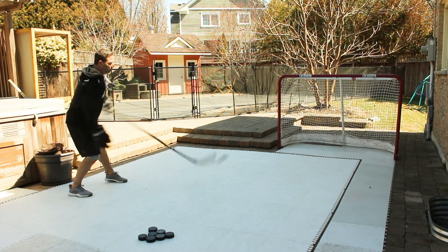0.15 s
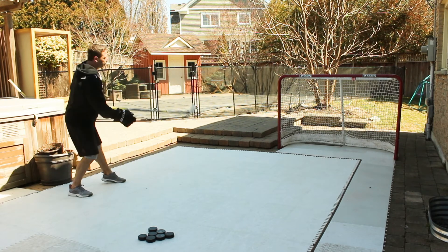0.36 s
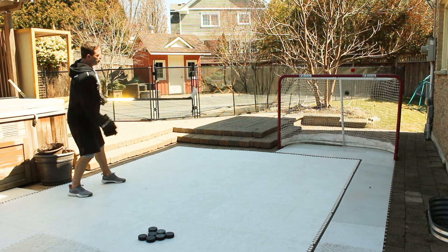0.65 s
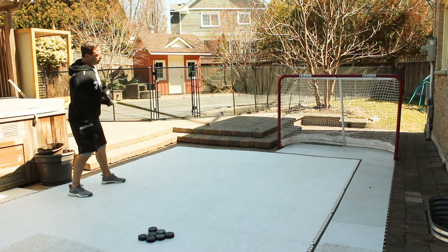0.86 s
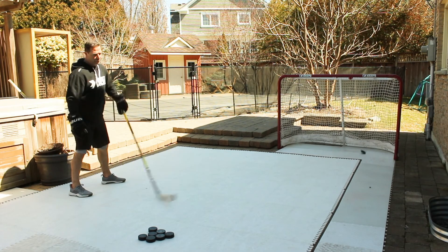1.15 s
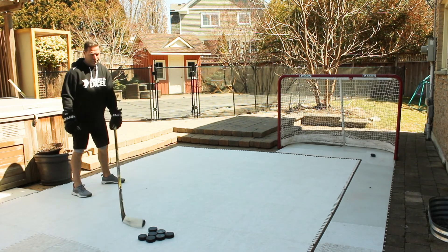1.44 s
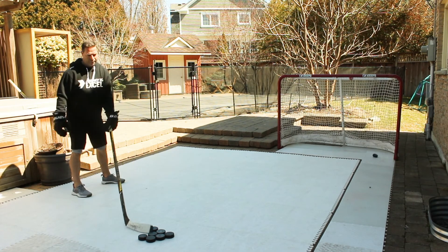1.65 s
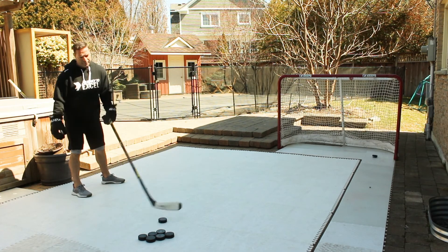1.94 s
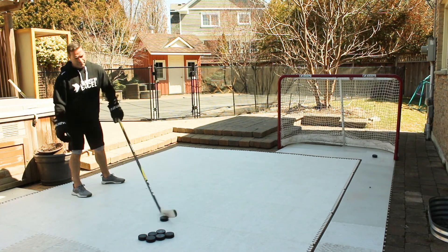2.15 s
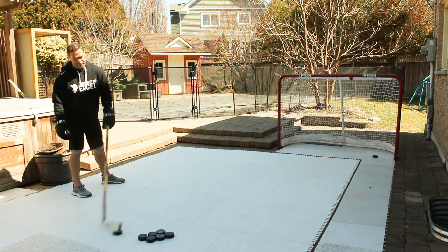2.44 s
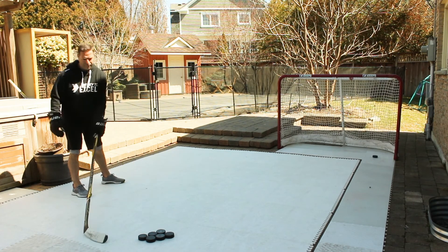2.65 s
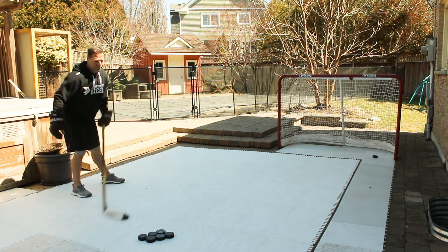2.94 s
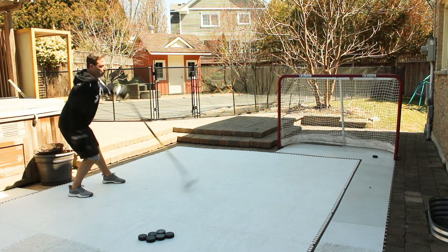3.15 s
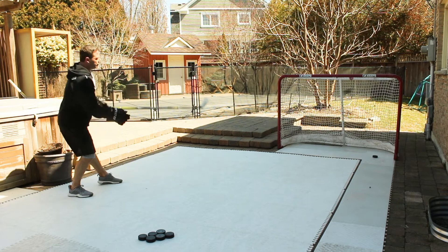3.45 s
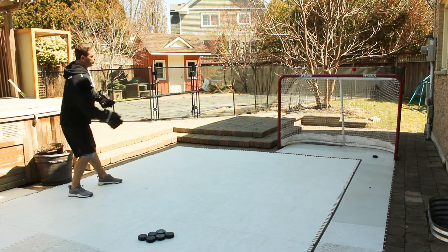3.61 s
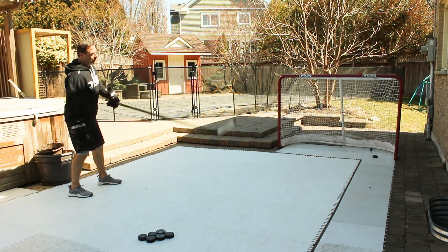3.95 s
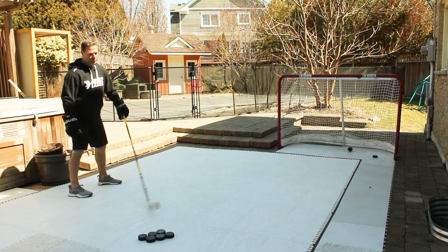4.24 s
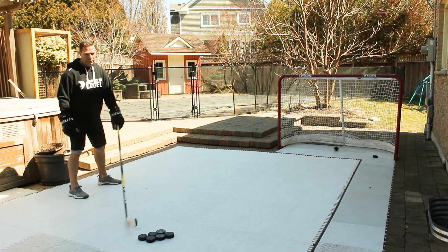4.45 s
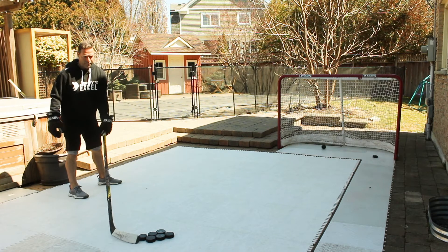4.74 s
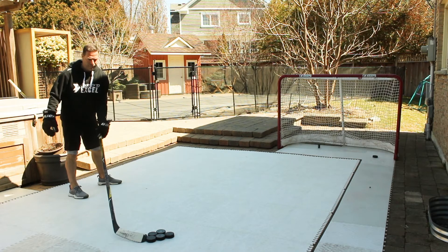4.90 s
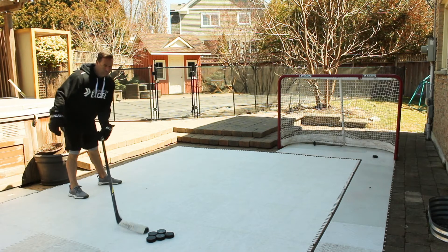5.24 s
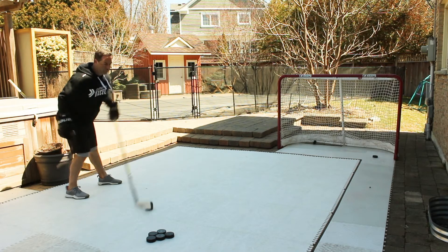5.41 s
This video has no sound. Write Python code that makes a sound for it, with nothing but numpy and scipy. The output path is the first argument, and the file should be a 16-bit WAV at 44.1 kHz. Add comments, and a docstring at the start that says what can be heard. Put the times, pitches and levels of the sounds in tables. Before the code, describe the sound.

A hockey stick scrapes a puck over plastic tiles right at the start, close by. From about 0.6 seconds the puck rustles into a net farther away, and the steel goal pings at 0.8. Sharp, hollow stick clacks come at 1.1 and 1.2 seconds, followed by a softly rumbling puck glide, light taps and further clacks near 2.1 and 2.6. A second shot swells into a drumming scrape from 3.0 to 3.2 seconds, landing with a quieter rustle and faint ring around 3.6. The stick clacks at 4.0 and harder at 4.25, then a puck slides with small knocks until about 5.0. A third scraping sweep builds from 5.2 seconds to the end. Each sound has a light, dull echo from the yard's fence and walls. A soft rush of outdoor air continues throughout, and a very faint, distant motor whine rises in pitch during the first three seconds.

```python
"""Sharp, hollow clacks and scrapes: someone practises hockey on plastic ice tiles in a fenced back yard.
The stick slaps the tiles, knocks a puck off the pile, taps it into place and sweeps it away.
The puck rustles into the net and rings the steel goal. Fence and house walls answer each sound,
and a motor whines far off in the soft rush of outdoor air."""
import sys
import numpy as np
from scipy import signal
from scipy.fft import rfft, irfft, next_fast_len
from scipy.io import wavfile
from scipy.ndimage import map_coordinates

SR = 44100
rng = np.random.default_rng(int(sys.argv[2]) if len(sys.argv) > 2 else 0)


def unload_audio(sound):
    """Save the sound as a 16-bit wav file, at the path given as the first command line argument."""
    columns = np.transpose(np.atleast_2d(sound))
    # keep every value between -1 and 1, then stretch to whole-number steps
    steps = np.round(np.clip(columns, -1, 1) * 32767)
    wavfile.write(sys.argv[1], SR, steps.astype(np.int16))


N = 245618
NOW = np.arange(N) / SR  # seconds into the scene
T = np.arange(SR // 6) / SR  # seconds since a hit
REBOUND_S = 0.012  # wait before the blade's second touch


def blows():
    """Hard hits of stick and puck; the springy blade touches again just after the first time."""
    # Each row: start in seconds; tile, thud, blade and crack in dB; clack in Hz; second touch in dB.
    hits = [(1.059, -15, -24, -14.5, -29, 1725, -2.5), (1.234, -13, -28.5, -20, -26.5, 2175, -13),
            (1.539, -25.5, -46, -28.5, -49.5, 2746, -6), (2.129, -21, -27.5, -24, -26.5, 1765, -8.5),
            (2.242, -29, -41, -28, -62, 1840, -7), (2.563, -15.5, -32.5, -25.5, -31, 2215, -5.5),
            (2.659, -28, -36.5, -32, -62, 1943, -5.5), (4.017, -21.5, -60, -14.5, -31.5, 2884, -5.5),
            (4.208, -24.5, -34, -25.5, -45, 1775, -3.5), (4.252, -12.5, -26.5, -17.5, -24, 1476, -9.5)]
    out = np.zeros((2, N))
    for start, tile_db, thud_db, blade_db, crack_db, clack_hz, rebound_db in hits:
        for delay, db in (0, 0), (REBOUND_S, rebound_db):
            hit = contact(thud_db, tile_db, blade_db, crack_db, clack_hz, ring_scale=0.88, top_hz=5700)
            add(out, start + delay, amp(db) * hit)
    return out


def contact(thud_db, tile_db, blade_db, crack_db, clack_hz, ring_scale, top_hz):
    """One touch: the tile bends and knocks hollowly, the blade clacks, the hard faces crack."""
    # Ringing tones. Each row: pitch in Hz, level in dB, fade time in seconds before ring_scale.
    thud_tones = [(304.3, -8, 0.06), (363, 2, 0.31), (438, -6.5, 0.14)]
    tile_tones = [(437, -10, 0.24), (542.4, -4.5, 0.19), (617.4, -0.5, 0.071), (745, 1, 0.082),
                  (931, -7.5, 0.17)]
    blade_tones = [(1150, 1, 0.054), (1508, 0, 0.05), (1716, -2, 0.17), (1910, 1, 0.079),
                   (2040, -11, 0.043), (2137, 0.5, 0.056), (2420, -3.5, .09), (2880, -3, 0.029),
                   (3055, -8, 0.11), (3250, -7, 0.064), (3474, -2.5, .1), (3820, -9.5, 0.16),
                   (4530, -3, 0.086)]
    # Noise colours. Each row: frequency in Hz, level in dB.
    thud_colour = [(25, -30), (70, -50.5), (110, -34), (160, -12.5), (240, -6), (330, 0), (430, -1.5),
                   (600, -17), (1200, -52)]
    tile_colour = [(30, -35), (120, -29), (250, -9.5), (400, 0), (600, 2.5), (800, -5), (1100, -8.5),
                   (1700, -23.5), (4000, -61)]
    blade_colour = [(300, -55), (800, -1), (1200, 2.5), (2000, 0), (2900, -1), (4200, -9.5), (5600, -14),
                    (8000, -16), (15000, -61)]
    crack_colour = [(1500, -35), (4000, -5), (6000, -6), (8000, 1), (10000, -6.5), (12500, -20),
                    (16000, -44)]
    thud = body(thud_tones, thud_colour, ring_scale, fade_s=0.24, tones_db=-1.5, snap=0.2)
    thud = blow_unit(thud * swell(0.0046))
    tile = body(tile_tones, tile_colour, ring_scale, fade_s=0.19, tones_db=-5.5, snap=0.81)
    tile = band(tile * swell(0.00077), low_hz=392, top_hz=3040)
    blade = body(blade_tones, blade_colour, ring_scale, fade_s=0.16, tones_db=-8.5, snap=0.36)
    blade = band(blade, low_hz=553, top_hz=top_hz)
    # The spot that is struck brings out one tone of the blade.
    clack = blow_unit(np.tile(np.sin(2 * np.pi * clack_hz * T) * fade(0.04), (2, 1)))
    blade = blow_unit(blade + amp(-8) * clack)
    crack = blow_unit(noise(crack_colour, len(T)) * (fade(0.11 * ring_scale) + 0.89 * fade(0.0084)))
    return amp(thud_db) * thud + amp(tile_db) * tile + amp(blade_db) * blade + amp(crack_db) * crack


def body(tones, colour, ring_scale, fade_s, tones_db, snap):
    """A struck object: clear tones over a noisy crowd of short ones, strongest at the very start."""
    crowd = blow_unit(noise(colour, len(T)) * (fade(fade_s * ring_scale) + snap * fade(0.017)))
    clear = ring(tones, ring_scale, scatter_db=3.5, detune=0.0075)
    return crowd + amp(tones_db) * blow_unit(np.tile(clear, (2, 1)))


def ring(tones, ring_scale, scatter_db, detune, t=T):
    """Fading tones; their strength and pitch shift with the place and grip of each hit."""
    out = np.zeros(len(t))
    for hz, db, fade_s in tones:
        louder, flip, higher = rng.standard_normal(3)
        wave = np.sign(flip) * np.sin(2 * np.pi * hz * (1 + detune * higher) * t)
        out += amp(db + scatter_db * louder) * wave * fade(fade_s * ring_scale, t)
    return out


def band(x, low_hz, top_hz):
    """Small objects give off little bass, and soft touches little treble."""
    return blow_unit(signal.sosfilt(signal.butter(2, [low_hz, top_hz], "band", fs=SR, output="sos"), x))


def taps():
    """The puck rocks softly against the blade and the tiles."""
    # Each row: start in seconds, then the tile, blade and crack levels in dB.
    touches = [(0.228, -56, -40.5, -75), (1.624, -40, -54, -79), (1.853, -42, -49.5, -71),
               (1.968, -46.5, -48.5, -75), (2.2, -31.5, -55, -54), (2.433, -30, -38.5, -53),
               (2.483, -32.5, -42, -49.5), (2.999, -30.5, -47, -57), (4.424, -36.5, -39, -53),
               (4.588, -38.5, -44.5, -79), (4.654, -35, -39.5, -62), (4.724, -40, -62, -73),
               (4.957, -46.5, -61, -77.5), (4.972, -44, -61, -82)]
    out = np.zeros((2, N))
    for start, tile_db, blade_db, crack_db in touches:
        add(out, start, tap(tile_db, blade_db, crack_db))
    return out


def tap(tile_db, blade_db, crack_db):
    """A soft double touch somewhere along the blade."""
    out = np.zeros((2, SR // 5))
    clack_hz = rng.uniform(1700, 2900)
    for delay, db in (0, 0), (REBOUND_S, -5):
        touch = contact(tile_db - 12, tile_db, blade_db, crack_db, clack_hz, ring_scale=0.96, top_hz=3120)
        add(out, delay, amp(db) * touch)
    return out


def sliding():
    """Shots and glides rub the same tiles, with a rough scrape and a fine hiss."""
    # Rubbing colours. Each row: frequency in Hz, level in dB.
    scrape_colour = [(400, -37), (1000, 3), (1600, -1.5), (2600, -2), (3800, -6.5), (5500, -15),
                     (9000, -26), (15000, -47)]
    hiss_colour = [(2000, -24.5), (4000, -3), (6000, -2.5), (8200, 5.5), (9700, 1.5), (11500, -12),
                   (16000, -24)]
    scrape = friction(scrape_colour, grain_db=2, grains_per_s=520)
    hiss = friction(hiss_colour, grain_db=2, grains_per_s=700)
    return shots(scrape, hiss) + glides(scrape, hiss)


def friction(colour, grain_db, grains_per_s):
    """Rubbing is countless tiny slips of uneven size that come in clumps."""
    return noise(colour, N, roughness=amp(grain_db * wobble(grains_per_s) + 0.93 * wobble(70)))


def shots(scrape, hiss):
    """The blade presses and eases off: tiles drum, it bites and scrapes, the puck flicks off its tip."""
    # Each row: start, bite, hardest press, flick and flick length in seconds, then level in dB.
    strokes = [(-0.2, -0.1, -0.02, 0.11, .048, -.5), (2.96, 3.015, 3.048, 3.2, .02, .5),
               (5.24, 5.295, 5.438, 5.64, .02, -1.5)]
    # The tiles drumming under the blade. Each row: frequency in Hz, level in dB.
    drum_colour = [(80, -52), (200, -24.5), (320, -7), (480, -1), (640, 1), (820, -1.5), (1100, -7.5),
                   (2000, -15.5), (5000, -45), (10000, -68)]
    out = np.zeros((2, N))
    drumming = friction(drum_colour, grain_db=0, grains_per_s=220)
    uneven_pressure = amp(1.2 * wobble(40))
    jump_s, jump_db = 0.018, 4.5  # the last of the pressure comes suddenly
    roll_s = 0.057  # the scrape lets up while the puck rolls out to the tip
    for start, bite, peak, flick, length, db in strokes:
        def press(on, off, build_db, ease_db):
            """Loudness builds up to the hardest press, then falls."""
            shape_db = np.interp(NOW, [on, peak - jump_s, peak, off], [-build_db, -jump_db, 0, -ease_db])
            return amp(db + shape_db) * gate(on, off, rise_s=0.26, fall_s=0.15) * uneven_pressure

        out += press(start, flick + length, build_db=12.5, ease_db=6.5) * amp(-30) * drumming
        out += press(bite, flick - roll_s, build_db=9, ease_db=4) * (amp(-33.5) * scrape + amp(-43) * hiss)
        spin = amp(db) * gate(flick, flick + length, rise_s=0.095, fall_s=0.11)
        out += spin * (amp(-31.5) * scrape + amp(-42.5) * hiss)
        if peak > 0:  # the bent blade slaps down
            add(out, peak, amp(db) * tap(tile_db=-25.5, blade_db=-33.5, crack_db=-48))
    return out


def glides(scrape, hiss):
    """A free puck rumbles and hisses ever more softly as it slows, bumping over tile seams."""
    # Each row: start and length in seconds, rumble in dB, its drop in dB per second, hiss in dB.
    slides = [(1.291, 0.96, -36.5, 23.5, -49.5), (2.158, 0.37, -39, 14, -57.5), (4.299, 0.63, -33, 37, -48)]
    # The puck's rumble. Each row: frequency in Hz, level in dB.
    rumble_colour = [(80, -46.5), (180, -22.5), (300, -5), (450, -2), (600, 1), (850, -4), (1300, -13.5),
                     (2500, -28), (5000, -43), (10000, -61)]
    seams_per_s, hiss_drop_db_per_s = 5, 61  # the hiss dies first
    out = np.zeros((2, N))
    rumble = friction(rumble_colour, grain_db=-2, grains_per_s=140) + amp(-15) * scrape
    for start, length, db, drop, hiss_db in slides:
        age = np.maximum(NOW - start, 0)
        moving = gate(start, start + length, rise_s=0.24, fall_s=0.39)
        out += moving * (amp(db - drop * age) * rumble + amp(hiss_db - hiss_drop_db_per_s * age) * hiss)
        for seam in np.arange(0.5, length * seams_per_s):
            after = (seam + rng.uniform(-0.5, 0.5)) / seams_per_s
            knock_db = db - drop * after - 2.5
            add(out, start + after, tap(knock_db, blade_db=knock_db - 11, crack_db=knock_db - 30))
    return out


def goal():
    """The net swallows the puck with a rustle and a thump; the steel pipe rings on."""
    # Each row: start in seconds, rustle in dB, rise in seconds, thump in dB, steel ring in dB.
    landings = [(0.56, -39, 0.021, -50, -63), (0.588, -37.5, 0.017, -54, -65.5),
                (0.798, -33, 0.0075, -71, -67), (0.814, -28.5, 0.0078, -64, -34.5),
                (3.604, -47, 0.013, -59, -80), (3.623, -48.5, 0.016, -64, -76),
                (3.672, -43.5, 0.0021, -61, -57.5)]
    # The pipe's tones. Each row: pitch in Hz, level in dB, fade time in seconds.
    steel_tones = [(2380, -2.5, 1), (2400, -5, 0.62), (2470, -14, 0.69), (2960, -4, 0.23),
                   (4170, -0.5, 0.15), (5712, -21, .5), (6500, -15, .4), (6700, -18, 0.43),
                   (6680, -9, 0.42)]
    # The net's noise colours. Each row: frequency in Hz, level in dB.
    rustle_colour = [(120, -50.5), (200, -20), (1090, -3), (2020, -5.5), (2380, -2), (2600, -7), (2950, -5),
                     (5170, -14), (7020, -17), (15000, -38.5)]
    thump_colour = [(60, -28), (110, -10), (155, 8), (230, -11), (600, -46)]
    out = np.zeros((2, N))
    for start, rustle_db, rise_s, thump_db, steel_db in landings:
        rustle = blow_unit(noise(rustle_colour, len(T)) * swell(rise_s) * fade(0.15))
        thump = blow_unit(noise(thump_colour, len(T)) * swell(rise_s) * fade(0.097))
        add(out, start, amp(rustle_db) * rustle + amp(thump_db) * thump)
        pipe = ring(steel_tones, ring_scale=1, scatter_db=1, detune=0, t=np.arange(SR) / SR)
        add(out, start, amp(steel_db) * pipe)
    return out


def yard(x):
    """Fence and house walls return a dull, scattered echo."""
    # How long the echo lasts. Each row: frequency in Hz, fade time in seconds.
    fade_times = [(100, 0.99), (500, 0.46), (2500, 1), (5000, 0.65), (9000, 0.27), (15000, 0.16)]
    # The echo's colour. Each row: frequency in Hz, level in dB.
    echo_colour = [(100, -0.5), (500, -3.5), (1200, -4.5), (3200, -7.5), (4300, -4.5), (6000, -3.5),
                   (12000, -1.5)]
    hz, t, bands = signal.stft(rng.standard_normal((4, 2, SR)), SR, nperseg=256)
    decay = fade(along(fade_times, hz)[:, None], t)
    bands = bands * decay * amp(along(echo_colour, hz))[:, None] * swell(0.013, t)
    tails = signal.istft(bands, SR, nperseg=256)[1]
    tails = tails + 0.64 * tails[:, ::-1]  # left and right hear much the same
    turn = np.arange(N) // (SR // 5) % len(tails)  # four random echoes take turns, so no tone sticks out
    return sum(signal.fftconvolve(x * (turn == k), tail / np.linalg.norm(tail[0]), axes=1)[:, :N]
               for k, tail in enumerate(tails))


def motor():
    """A far motor whines, louder as it speeds up; the long way through the air blurs its tones."""
    # Each row: time in seconds, pitch in Hz.
    pitch_path = [(.1, 1720), (.4, 2140), (.7, 2360), (1.0, 2443), (1.65, 2410), (2.08, 2616), (2.4, 2560),
                  (2.74, 2637), (2.9, 2420)]
    # The whine's tones as multiples of that pitch, and the level of each in dB.
    multiples = [1, 4 / 3, 2, 3, 4]
    levels_db = [2.5, 0, -2.5, -11, -18]
    pitch = np.interp(NOW, *np.transpose(pitch_path))
    flutter = 1 + 0.009 * wobble(220)
    phase = 2 * np.pi * np.cumsum(pitch * flutter) / SR
    whine = np.zeros((2, N))
    for channel in whine:
        for k, db in zip(multiples, levels_db):
            channel += amp(db) * (wobble(210) * np.sin(k * phase) + wobble(210) * np.cos(k * phase))
    level = amp(-59.5 + 6.5 * np.log2(pitch / pitch.max()))  # 6.5 dB louder per doubling of speed
    return level * gate(on=0.27, off=2.81, rise_s=0.56, fall_s=1) * whine


def air():
    """Outdoor air: a soft, low rush that barely wavers."""
    # Each row: frequency in Hz, level in dB.
    air_colour = [(15, -63), (25, -45), (92, -24.5), (117, -1), (166, -16), (206, -5.5), (263, -4.5),
                  (818, -13.5), (2160, -18), (2350, -17.5), (3430, -18.5), (3720, -17.5), (4140, -21.5),
                  (5730, -23), (16000, -35)]
    # Each row: frequency in Hz, how alike left and right are (1 is the same).
    air_likeness = [(60, 0.7), (240, 0.98), (950, 0.59), (3770, 0.07), (15000, -0.4)]
    return amp(-56.5 + 0.23 * wobble(7.8)) * noise(air_colour, N, air_likeness)


def noise(colour, size, likeness=None, roughness=1):
    """Stereo noise of average power 1, roughened first and then coloured."""
    # Each row: frequency in Hz, how alike left and right are (1 is the same).
    usual_likeness = [(100, 1), (500, 0.96), (2000, 0.66), (4000, 0.54), (12000, 0.27)]

    def response(hz):
        """Split each frequency into what both sides share and what sets them apart."""
        alike = along(usual_likeness if likeness is None else likeness, hz)
        angle = np.arccos(np.clip(alike, -1, 1)) / 2
        return amp(along(colour, hz)) * [np.cos(angle), np.sin(angle)]

    mid, side = filtered(roughness * rng.standard_normal((2, size)), response)
    stereo = np.array([mid + side, mid - side])
    return stereo / np.sqrt(np.mean(stereo ** 2) + 1e-20)


def amp(db):
    """Turn decibels into a gain."""
    return 10 ** (np.asarray(db) / 20)


def blow_unit(x):
    """Give a stereo burst the energy of 20 ms of sound at power 1."""
    return x / np.sqrt(np.sum(x ** 2) / (2 * SR * 0.02) + 1e-20)


def along(points, hz):
    """Read between rows of frequency and value, on a log frequency scale."""
    known_hz, values = np.transpose(points)
    return np.interp(np.log(hz + 1), np.log(known_hz + 1), values)


def wobble(rate):
    """A smooth curve through `rate` random points a second."""
    points = rng.standard_normal(int(N * rate / SR) + 4)
    coarse = np.arange(0, N, 16)
    return np.interp(np.arange(N), coarse, map_coordinates(points, [coarse * rate / SR]))


def filtered(x, response):
    """Multiply each frequency in x by response(hz)."""
    size = x.shape[-1]
    padded = next_fast_len(size + 1024, True)
    return irfft(rfft(x, padded) * response(np.fft.rfftfreq(padded, 1 / SR)), padded)[..., :size]


def fade(fade_s, t=T):
    """Die away by 60 dB in fade_s seconds."""
    return np.exp(-np.log(1000) * t / fade_s)


def swell(rise_s, t=T):
    """Rise from 0 towards 1, about two thirds of the way in rise_s seconds."""
    return 1 - np.exp(-t / rise_s)


def gate(on, off, rise_s, fall_s):
    """Hold 1 from on to off; 60 dB down rise_s before and fall_s after."""
    return fade(rise_s, np.maximum(on - NOW, 0)) * fade(fall_s, np.maximum(NOW - off, 0))


def add(track, start, sound):
    """Mix a sound into the track at start seconds."""
    part = track[:, max(round(start * SR), 0):][:, :sound.shape[-1]]
    part += sound[..., :part.shape[1]]


def scene():
    """The play and its echo, slightly off centre, with the motor and the air behind."""
    # Each row: frequency in Hz, left level minus right level in dB.
    balance = [(100, 1), (500, 2.5), (1000, 1.4), (2000, 0.8), (8000, 1), (13000, -0.5)]
    near = blows() + taps() + sliding()
    far = goal()
    play = near + far + yard(amp(-16.5) * near + amp(-14.5) * far)
    sides, left_lag_s = np.array([[0.5], [-0.5]]), 2.3e-5
    placed = filtered(play, lambda hz: amp(sides * along(balance, hz))
                      * np.exp(-2j * np.pi * hz * sides * left_lag_s))
    return placed + motor() + air()


def record(dry):
    """The microphone thins the bass; the highest peaks are rounded and the top treble is cut."""
    low_cut_hz, top_hz = 136, 15900
    thin = signal.sosfilt(signal.butter(1, low_cut_hz, "high", fs=SR, output="sos"), dry)
    rounded = thin / (1 + np.abs(thin) ** 10) ** (1 / 10)
    return filtered(rounded, lambda hz: 1 / (1 + (hz / top_hz) ** 130))


dry = scene()
out = record(dry)
unload_audio(out)
```